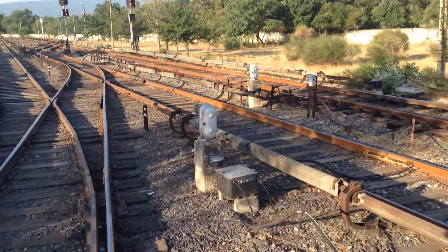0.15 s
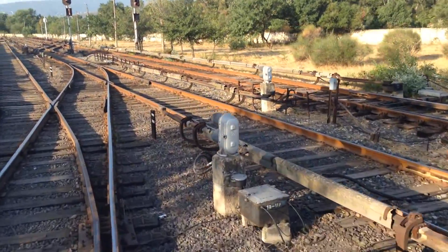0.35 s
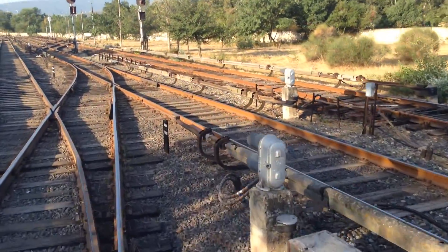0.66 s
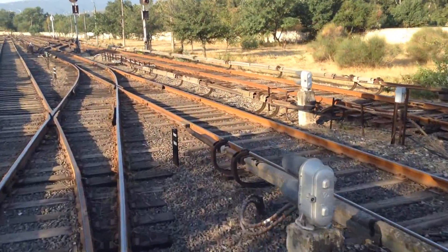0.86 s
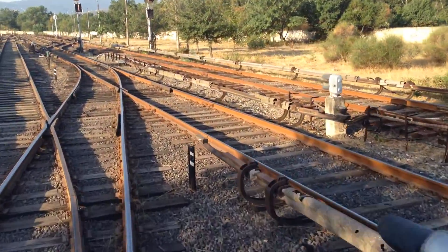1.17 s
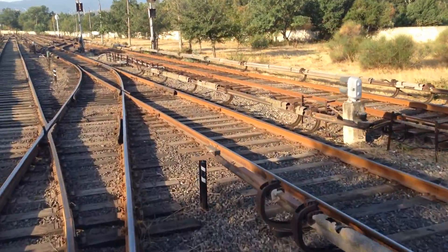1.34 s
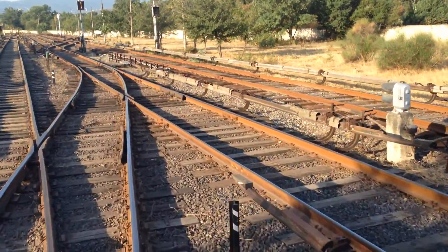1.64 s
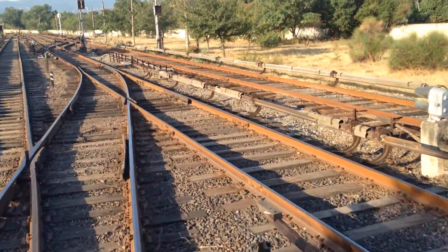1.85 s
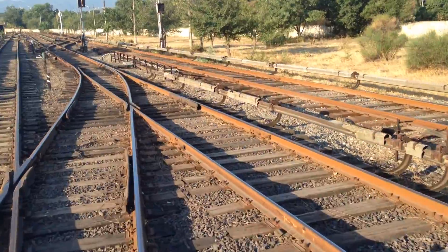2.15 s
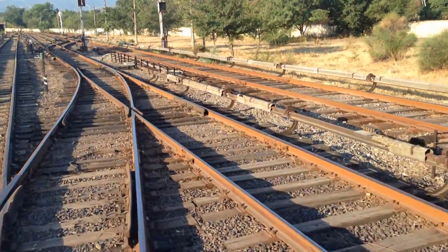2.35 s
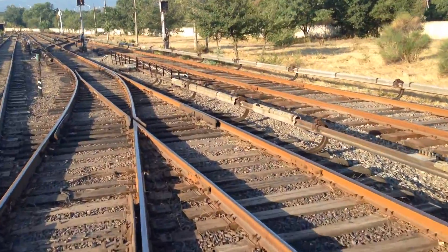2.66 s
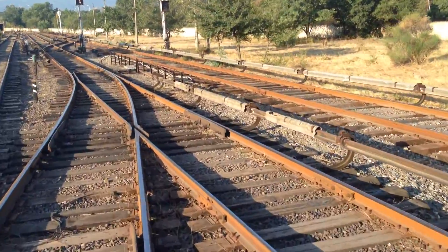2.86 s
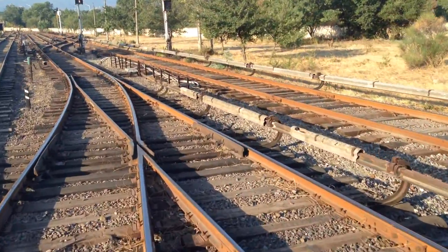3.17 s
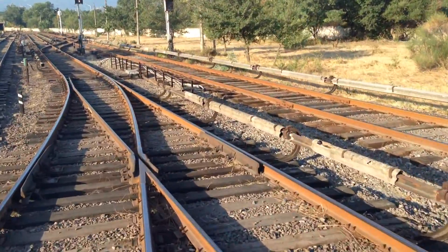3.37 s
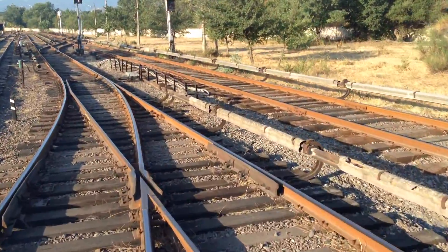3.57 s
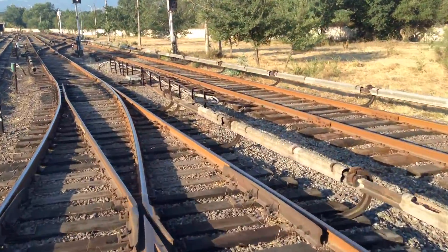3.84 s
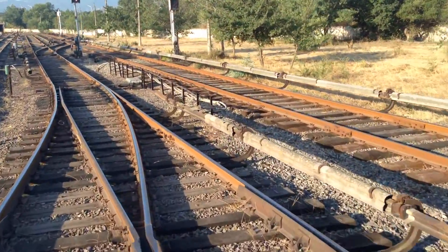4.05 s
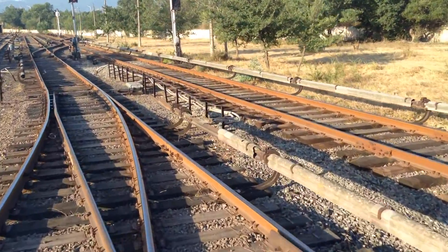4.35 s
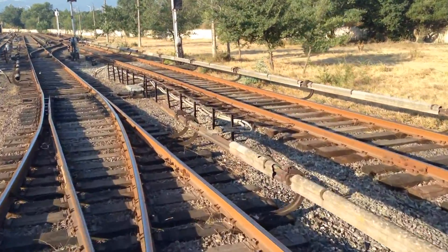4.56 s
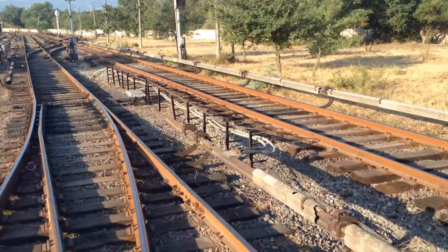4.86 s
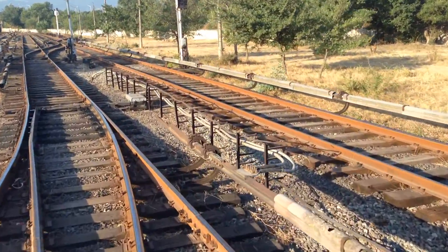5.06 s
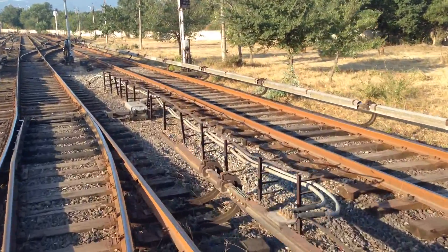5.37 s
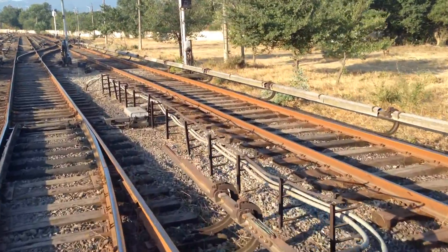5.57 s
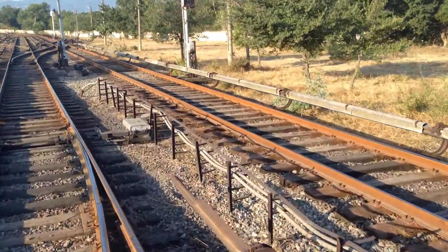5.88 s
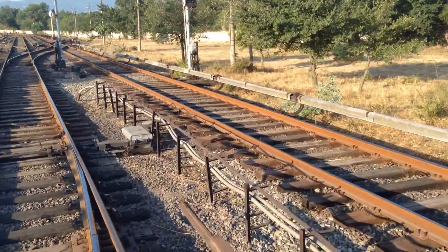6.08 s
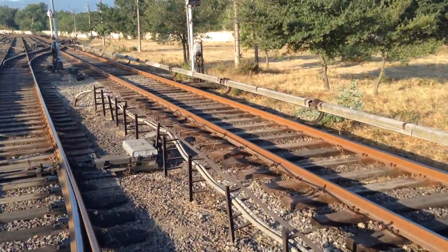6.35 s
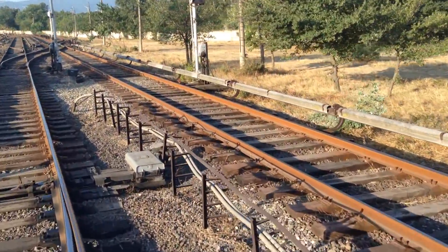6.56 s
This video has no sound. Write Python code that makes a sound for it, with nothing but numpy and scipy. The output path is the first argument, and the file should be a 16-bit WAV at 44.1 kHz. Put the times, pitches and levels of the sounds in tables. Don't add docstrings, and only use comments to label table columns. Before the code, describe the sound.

High, fluttering steel wheel squeal fades into rumbling and heavy clanking knocks over rail switches, finishing with pulsing low hoots from the wheels.

```python
import sys
import numpy as np
from scipy import signal
from scipy.fft import rfft, irfft, next_fast_len
from scipy.io import wavfile
from scipy.ndimage import uniform_filter1d, map_coordinates

SR = 44100
rng = np.random.default_rng(int(sys.argv[2]) if len(sys.argv) > 2 else 0)


def ratio_of_db(decibels):
    return 10 ** (np.asarray(decibels, float) / 20)


def dump(signal):
    limited = np.clip(np.atleast_2d(signal).T, -1, 1)
    pcm = np.round(limited * 32767).astype(np.int16)
    wavfile.write(sys.argv[1], SR, pcm)


N = 296352


def unit(x):
    return x / np.sqrt(np.mean(x ** 2) + 1e-20)


def along(points, hz):
    f, v = np.transpose(points)
    return np.interp(np.log(hz + 1), np.log(f + 1), v)


def curves(rows):
    s, *cols = np.transpose(rows)
    return [np.interp(np.arange(N) / SR, s, c) for c in cols]


def wobble(rate):
    coarse = np.arange(0, N + 32, 32)
    knots = rng.standard_normal(int(N * rate / SR) + 4)
    return np.interp(np.arange(N), coarse, map_coordinates(knots, [coarse * rate / SR]))


def spells(rows):
    t = np.arange(0, N + 32, 32) / SR
    s, db, half = np.transpose(rows)[:, :, None]
    swells = ratio_of_db(db) * np.exp(-((t - s) / half) ** 2)
    return np.interp(np.arange(N) / SR, t, np.sum(swells, axis=0))


def filtered(x, response):
    m = next_fast_len(x.shape[-1] + 4096, True)
    return irfft(rfft(x, m) * response(np.fft.rfftfreq(m, 1 / SR)), m)[..., :x.shape[-1]]


def mode(hz, centre_hz, width_hz):
    return 1j * hz * width_hz / (centre_hz ** 2 - hz ** 2 + 1j * hz * width_hz)


def rush(response, patchy_db):
    z = signal.stft(rng.standard_normal(N + 512), nperseg=512)[2]
    field = uniform_filter1d(rng.standard_normal(z.shape), 5, 0)
    field = uniform_filter1d(field, 10, 1)
    noise = signal.istft(z * ratio_of_db(patchy_db * unit(field)), nperseg=512)[1][:N]
    return unit(filtered(noise, response))


def phase(hz):
    return 2 * np.pi * np.cumsum(hz + np.zeros(N)) / SR


# t/s, mode f/Hz, level/dB, half length/s
RING_UPS = [(0.056, 2531, 6, 0.13), (2.83, 2531, 6, 0.11), (3.64, 2531, 14, 0.1), (3.37, 2531, 4, 0.14),
            (1.75, 4940, -4, 0.3), (2.83, 4940, 3, .1), (1.04, 2531, 2, 0.091), (3.71, 4940, 5.5, 0.16),
            (3.7, 6217, 4, 0.13), (6.21, 3710, 4.5, 0.14), (6.11, 4940, 8, 0.072), (6.47, 4940, 8, 0.19)]


def ring_up(hz):
    return 1 + spells([(s, db - 200 * (abs(at / hz - 1) > .1), half) for s, at, db, half in RING_UPS])


# f/Hz, level/dB per Hz
RUMBLE = [(12, -55), (20, -24), (38, -13), (70, 6), (86, 8), (108, -28), (130, -3.5), (170, -10),
          (290, -120)]
# f/Hz, level/dB per Hz
BODY = [(59, -9.5), (100, -1.5), (277, 1), (471, -6.5), (570, -8), (661, -12), (970, -17.5), (1180, -13),
        (1440, -16), (1630, -25), (2490, -17.5), (2930, -52), (3400, -31), (4420, -23), (7480, -120)]
# f/Hz, level/dB per Hz
HISS = [(1500, -120), (3000, -6.5), (5000, 2), (8000, 3), (10500, 0.5), (13000, -4), (15300, -6),
        (17000, -18)]
# f/Hz, level/dB per Hz
RAILS = [(1500, -120), (2600, 3.5), (3600, -8.5), (4300, -2), (5200, 2), (6500, 5), (8000, -6),
         (10000, -7.5), (13000, -22), (17000, -17)]
# f/Hz, width/Hz, level/dB
WHEEL_MODES = [(1172, 150, 2.5), (2528, 73, 4), (3168, 94, -4), (3700, 92, 2.5), (4940, 110, 2),
               (6200, 55, 1), (6520, 150, 0.5), (7640, 140, -4), (8720, 110, -9.5), (9600, 85, -18)]
# t/s, level/dB
GRIND = [(0, -49), (.2, -56), (.45, -53.5), (1.66, -58), (2.1, -62.5), (2.35, -61), (4.45, -68), (5, -68.5),
         (6.05, -64.5), (6.72, -65.5)]
# t/s, rumble level/dB, rail body level/dB, half length/s
LURCHES = [(0, -59, -43.5, 0.25), (0.416, -42.5, -38, 0.096), (0.843, -48, -35, 0.093),
           (1.004, -39.5, -51, 0.11), (1.297, -29, -38.5, 0.045), (1.44, -40, -42, 0.14),
           (1.863, -54, -45, 0.45), (2.137, -37, -51, 0.04), (2.53, -42.5, -51.5, 0.13),
           (2.832, -54, -38, 0.065), (3.04, -42.5, -45, 0.31), (3.486, -50, -50.5, 0.58),
           (3.677, -42, -60, 0.064), (4.166, -42, -48, 0.19), (4.483, -34, -76, 0.057),
           (4.69, -47, -45, 0.13), (5.044, -47, -60, 0.13), (5.587, -43, -48, 0.74),
           (6.066, -39, -42.5, 0.054), (6.28, -48, -45, 0.1), (6.537, -34.5, -41, 0.09),
           (6.72, -64, -36, 0.08)]
# t/s, level/dB, half length/s
SCRAPES = [
    (6.6, -61, 0.028),
]


def rolling():
    grind_db, = curves(GRIND)
    even_db = -44 + .5 * np.arange(N) / SR
    shake = ratio_of_db(-49.5) + spells([(s, db, half) for s, db, _, half in LURCHES])
    load = ratio_of_db(even_db) + spells([(s, db, half) for s, _, db, half in LURCHES])
    rumble = shake * rush(lambda f: ratio_of_db(along(RUMBLE, f)), patchy_db=0.5)
    body = load * ratio_of_db(0.34 * wobble(9.4)) * rush(lambda f: ratio_of_db(along(BODY, f)), patchy_db=2.5)
    flange = (ratio_of_db(grind_db) + spells(SCRAPES)) * ratio_of_db(9.0)
    hiss = flange * rush(lambda f: ratio_of_db(along(HISS, f)), patchy_db=2.0)
    rail_gain = ratio_of_db(-53.5 + 0.59 * wobble(4.16) + 0.63 * wobble(36))
    rails = rail_gain * rush(lambda f: ratio_of_db(along(RAILS, f)), patchy_db=3.0)

    modes = filtered(rng.standard_normal(N),
                     lambda f: np.array([mode(f, hz, width) ** 2 for hz, width, _ in WHEEL_MODES]))
    rings = sum(ratio_of_db(db + 1.3 * wobble(4.95)) * ring_up(hz) * ring
                for ring, (hz, _, db) in zip(modes, WHEEL_MODES))
    kicks = spells([(s, db + clank_db - 39, 0.013) for s, db, _, clank_db, _ in blows()])
    ring_gain = ratio_of_db(-56 + 0.56 * (grind_db - grind_db.mean())) + kicks
    return rumble + body + hiss + rails + ring_gain * ratio_of_db(6) * unit(rings)


# t/s, f/Hz
SQUEAL_PITCH = [(0, 3715), (1.3, 3712), (1.8, 3717), (3.8, 3714), (4.1, 3710), (5.2, 3700)]
# f/Hz, width/Hz, level/dB
NEIGHBOURS = [
    (3727, 42, -1),
    (3675, 58, -5),
    (7402, 163, -12.5),
]
# t/s, level/dB
SLIP = [(0, -28), (.09, -38), (.14, -32), (.55, -37.5), (.61, -32), (.65, -31), (.7, -32.5), (1.05, -32),
        (1.17, -31), (2.2, -33), (2.55, -40), (2.75, -37), (3.46, -35.5), (3.68, -39.5), (4.02, -43.5),
        (4.5, -41), (4.8, -55.5), (5.2, -43)]
# t/s, level/dB, half length/s
LOCKS = [(0.014, -24.5, 0.018), (0.072, -20, 0.034), (0.183, -39, 0.14), (0.223, -27, 0.0088),
         (0.326, -31, 0.017), (0.468, -33, 0.0081), (0.477, -24, 0.064), (0.604, -24.5, 0.021),
         (0.695, -23.5, 0.0087), (0.734, -25.5, 0.059), (0.837, -22, 0.012), (0.889, -28.5, 0.02),
         (0.944, -29, 0.018), (1.014, -28.5, 0.043), (1.015, -35, 0.029), (1.123, -20.5, 0.024),
         (1.173, -19, 0.022), (1.217, -27, 0.0062), (1.292, -22.5, 0.043), (1.363, -26, 0.015),
         (1.402, -29.0, 0.016), (1.447, -27.5, 0.016), (1.504, -24, 0.014), (1.576, -31.5, 0.061),
         (1.721, -30, 0.06), (1.806, -30, 0.019), (1.923, -26.0, 0.073), (2.129, -42.5, 0.36),
         (2.186, -27, 0.0051), (2.204, -31, .008), (2.228, -32, .008), (2.409, -30, 0.02),
         (2.451, -32.5, 0.074), (2.609, -29, 0.016), (2.73, -26, 0.012), (2.732, -40, 0.058),
         (2.817, -29.5, 0.0083), (2.884, -33.5, 0.012), (2.989, -27.0, 0.055), (3.06, -28, 0.025),
         (3.165, -26, 0.046), (3.284, -31, 0.014), (3.441, -36, 0.0071), (3.469, -34, 0.1),
         (3.686, -30.5, 0.056), (3.733, -35.5, 0.02), (3.801, -33, 0.019), (4.02, -42, 0.1),
         (4.254, -41.5, 0.057), (4.369, -37, 0.025), (4.495, -34.5, 0.1), (4.62, -47, 0.01),
         (4.851, -56, 0.29)]
# t/s, level/dB, half length/s
JUMPS = [(0.027, -45, 0.035), (0.083, -33.5, 0.034), (0.18, -50, 0.01), (0.209, -50, 0.084),
         (0.401, -44, 0.019), (0.498, -37.5, 0.035), (0.593, -46, 0.14), (0.686, -38, 0.038),
         (0.818, -42, 0.028), (0.913, -37, 0.024), (0.964, -35.5, 0.015), (1.091, -40.0, 0.06),
         (1.228, -38.5, 0.038), (1.289, -35.5, 0.023), (1.351, -32.5, 0.014), (1.389, -43.5, 0.099),
         (1.474, -44.5, 0.0083), (1.516, -43, 0.17), (1.538, -43, 0.0084), (1.776, -33.5, 0.064),
         (1.844, -35.5, 0.018), (1.929, -40, 0.036), (2.02, -41.5, 0.02), (2.056, -40, 0.011),
         (2.134, -41.5, 0.058), (2.273, -38.5, 0.047), (2.366, -38, 0.055), (2.492, -33.0, 0.04),
         (2.552, -33, 0.066), (2.702, -38, 0.055), (2.848, -41.5, 0.066), (2.98, -43, 0.038),
         (3.089, -46.5, 0.038), (3.294, -48, 0.19), (3.435, -44, 0.019), (3.575, -40.5, 0.062),
         (3.745, -45.5, 0.06)]


def squeal():
    (others_db,), (grind_db,) = curves(SLIP), curves(GRIND)
    lock = spells(LOCKS) + ratio_of_db(others_db - 25)
    jump = spells(JUMPS) + ratio_of_db(others_db - 36)
    third = ratio_of_db(1.8 * (grind_db - GRIND[2][1]) + 2.3 * wobble(7.2))
    third = third * (ratio_of_db(-48) + ratio_of_db(-28) * jump)
    hz, = curves(SQUEAL_PITCH)
    fade = np.clip((SLIP[-1][0] - np.arange(N) / SR) / 0.19, 0, 1)
    turn = phase(hz + 1.49 * wobble(29.99))
    tone = lock * ratio_of_db(1.4 * wobble(45)) * np.sin(turn + 0.12 * wobble(60))
    tone += jump * ratio_of_db(3.5 + 1.53 * wobble(50)) * np.sin(2 * turn + 0.28 * wobble(60))
    tone += third * ratio_of_db(-3 + 4.5 * wobble(75)) * np.sin(3 * turn - phase(36) + 1.3 * wobble(140))
    tone += third * ratio_of_db(-9.5 + 2.5 * wobble(60)) * np.sin(4 * turn - phase(50) + 2.8 * wobble(200))

    def band(f):
        return sum(ratio_of_db(db) * mode(f, hz, width) ** 2 for hz, width, db in NEIGHBOURS)

    others = ratio_of_db(others_db - 4.5 + 0.88 * wobble(29.77)) * rush(band, patchy_db=0.0)
    return fade * (tone + others)


# t/s, level/dB, half length/s
CATCHES = [(0.006, -37, 0.0099), (0.062, -46.0, 0.015), (0.19, -35, 0.16), (0.329, -40.5, 0.0094),
           (0.445, -37, 0.087), (0.456, -39, 0.016), (0.623, -39, 0.105), (0.838, -31, 0.069),
           (0.983, -37, 0.02), (1.052, -28, 0.017), (1.118, -44, 0.07), (1.203, -26, 0.012),
           (1.308, -24.5, 0.018), (1.342, -35, 0.13), (1.52, -35, 0.078), (1.677, -31, 0.044),
           (1.815, -28.5, 0.086), (1.999, -30, 0.039), (2.162, -33.5, 0.2), (2.335, -25.5, 0.0096),
           (2.433, -47, 0.048), (2.598, -36, 0.17), (2.774, -37, 0.016), (2.826, -49, 0.021),
           (2.989, -38.5, 0.12), (3.086, -32, 0.011), (3.157, -39.5, 0.035), (3.312, -34.5, 0.09),
           (3.545, -40.5, 0.15), (3.552, -45, 0.011), (3.867, -43.5, 0.17), (4.202, -38.5, 0.086),
           (4.513, -41, 0.17), (4.522, -38, 0.015)]


def partner():
    turn = phase(3675 + 6 * wobble(7.6))
    return spells(CATCHES) * ratio_of_db(-1.5 + 2.9 * wobble(40)) * np.sin(turn + 0.5 * wobble(60))


# t/s, f/Hz
HOWL_PITCH = [(0, 578), (6.3, 570.8), (6.5, 581), (6.62, 574.5), (6.72, 589)]
# multiple, level/dB
HOWL_PARTIALS = [(2, -32), (3, -30), (4, -29)]
# t/s, level/dB, half length/s
HOWLS = [(0, -44, 0.13), (.42, -48.5, 0.31), (.8, -53, 0.033), (1.0, -49, 0.031), (1.24, -29, 0.0075),
         (1.42, -48, 0.063), (1.66, -44.5, 0.044), (1.94, -44, 0.034), (2.12, -40, 0.033),
         (2.3, -46.5, 0.086), (2.55, -38, 0.086), (2.68, -43, 0.099), (2.81, -41.5, 0.068),
         (3.12, -49.5, 0.33), (3.92, -44.5, 0.06), (4.33, -47, 0.031), (4.5, -36, 0.033), (4.78, -44, 0.6),
         (5.18, -50, 0.12), (5.57, -45, 0.055), (5.77, -42, 0.053), (6.18, -42, 0.16)]
# t/s, level/dB, half length/s
SURGES = [
    (6.348, -18.5, 0.022),
    (6.447, -12.5, 0.029),
    (6.548, -14, 0.04),
    (6.655, -18.5, 0.04),
    (6.7, -17.5, 0.023),
]
# t/s, level/dB, half length/s
SNAPS_2 = [(6.38, -44, 0.015), (6.437, -44.0, 0.033), (6.56, -42.5, 0.05), (6.565, -42, 0.011),
           (6.667, -48.5, 0.016), (6.706, -38, 0.0082)]
# t/s, level/dB, half length/s
SNAPS_3 = [(6.444, -51, 0.015), (6.499, -53.5, 0.0062), (6.575, -42, 0.008), (6.598, -46, 0.01),
           (6.69, -41, 0.012)]
# t/s, level/dB, half length/s
WHISTLES = [
    (.074, -45.5, 0.039),
    (.18, -45, 0.014),
    (.33, -56, 0.065),
            (2.753, -46, 0.019), (2.81, -49, 0.11), (2.853, -39, 0.022), (3.058, -42, 0.013),
         (2.944, -33, 0.006), (2.961, -31.5, 0.076), (3.111, -32.5, 0.029), (3.162, -37.5, 0.017),
         (3.236, -37.5, 0.045), (3.343, -46.0, 0.034), (3.47, -52, 0.033), (3.585, -47, 0.013),
         (3.63, -48, 0.013), (3.88, -47.5, 0.026), (3.988, -47, 0.011), (4.05, -47, 0.019),
         (4.15, -41.5, 0.021), (4.261, -50, 0.009)]


def low_modes():
    howl = spells(HOWLS) + spells(SURGES)
    turn = phase(curves(HOWL_PITCH)[0] + 1.1 * wobble(22))
    loose = np.clip(1 - howl / ratio_of_db(-33.0), 0, 1)
    tone = howl * ratio_of_db(1.5 + 4.9 * loose * wobble(30)) * np.sin(turn + 1.34 * loose * wobble(35))
    drive = uniform_filter1d(howl, size=7000, origin=700) ** 2 / ratio_of_db(-13.5)
    snaps = {2: SNAPS_2, 3: SNAPS_3}
    for k, db in HOWL_PARTIALS:
        k = round(k)
        snap = ratio_of_db(2.5) * spells(snaps[k]) if k in snaps else 0
        gain = drive * ratio_of_db(db + 2.6 * wobble(70)) + snap
        tone += gain * np.sin(k * turn + 0.4 * k * wobble(90))
    whistle = np.sin(phase(1440 + 5 * wobble(25.1)))
    return tone + spells(WHISTLES) * ratio_of_db(1.9 + 1.2 * wobble(45)) * whistle


JOINT_S = 0.027
# t/s, peak level/dB, thud f/Hz, clank under the thud level/dB
JOINTS = [(.363, -28.5, 261, -26), (0.682, -33, 271, -9), (1.651, -31.5, 139, -5), (1.969, -30, 244, -3),
          (2.504, -28, 173, -45), (2.589, -27, 403, -10), (2.819, -25, 254, -17.5), (3.062, -31.5, 361, -2),
          (3.543, -28.5, 269, -8.5), (3.85, -29, 270, -8.5), (4.245, -26, 254.5, -8.5),
          (4.639, -23, 275, -11), (5.124, -29.5, 349, -5.5), (5.445, -28.5, 255, -8.5),
          (5.548, -24, 254.7, -16), (5.929, -30.5, 241, -13), (6.048, -25, 264, -17),
          (6.217, -23, 248, -15), (6.589, -31.5, 320, -7)]
# t/s, peak level/dB, thud f/Hz, clank under the thud level/dB, length/s
GAPS = [(.772, -16, 268, -4.5, 0.025), (1.235, -19, 140, -12, 0.025), (2.114, -21, 153, -12, 0.015),
        (2.336, -20, 265.3, -17, 0.051), (2.656, -22, 158.3, -40, 0.0079), (3.649, -20, 153.4, -26, 0.011),
        (4.084, -20, 197, -9, 0.015), (4.488, -8, 413, -10.5, 0.019), (4.544, -18, 378, -8.5, 0.013),
        (4.967, -16.5, 326, -9, 0.025), (5.199, -9, 245, -18, 0.022), (5.302, -20, 237.5, -11.5, 0.028),
        (5.683, -15.5, 260, -16, 0.036), (5.774, -23, 149, -10.5, 0.041), (6.143, -21.5, 164, -22, 0.012)]


def blows():
    return sorted(GAPS + [row + (JOINT_S,) for row in JOINTS])


# f/Hz, level/dB
THUD = [(40, -23), (90, -29), (150, 0.5), (260, -2), (420, -2.5), (700, -16), (1200, -51), (2500, -120)]
# f/Hz, level/dB
CLANK = [(300, -17), (700, 14.5), (1400, 9), (2600, 1), (3000, -9.5), (4000, -10), (7000, -11.5),
         (11000, -43), (15000, -63)]


def joints():
    out, t = np.zeros(N + SR), np.arange(SR // 3) / SR
    shake = rng.standard_normal((len(blows()), 3, len(t)))
    rattles = filtered(shake[:, 0], lambda f: ratio_of_db(along(THUD, f)))
    rattles /= np.sqrt(np.abs(uniform_filter1d(rattles ** 2, size=500)) + 1e-9)
    clanks = unit(filtered(shake[:, 1], lambda f: ratio_of_db(along(CLANK, f))))
    edges = unit(filtered(shake[:, 2],
                          lambda f: mode(f, 2700, 4200) ** 2 * (1 - 0.39 * mode(f, 3080, 700))))
    for (s, db, hz, clank_db, length), rattle, clank, edge in zip(blows(), rattles, clanks, edges):
        u = t / np.clip(length, .004, .08)
        ring_on = 0.14 * (1 - np.exp(-u)) * ratio_of_db(-60 * t / 1.5) * (1 - t / t[-1])
        swell = u ** 0.33 * np.exp(0.22 * (1 - u * u)) + ring_on
        edge_db = -49.5 + (db + clank_db + 34) - db
        gap = length != JOINT_S
        late = np.clip(t - 0.01194, 0, None)
        strike = ratio_of_db(-5.5 - 10 * gap) * np.exp(-late / 0.0086) * np.sin(2 * np.pi * hz * late)
        note = np.clip(.28 - 0.018 * clank_db, 0, 1)
        thud = 0.48 * ratio_of_db(-2.5 * gap) * (1.2 - note) * rattle
        thud += 0.54 * ratio_of_db(-4 * gap) * note * np.sin(2 * np.pi * hz * t)
        hit = thud + ratio_of_db(clank_db - 8.5) * swell ** 0.19 * clank + ratio_of_db(edge_db - 6.5) * edge
        out[max(round((s - .009) * SR), 0):][:len(t)] += ratio_of_db(db) * (swell * hit + strike)
    return out[:N]


# t/s, level/dB, half length/s
SCUFFS = [
    (.55, -50, 0.18),
    (1.07, -45, 0.12),
    (4.655, -50, 0.016),
    (5.318, -47, 0.016),
]
# t/s, level/dB, half length/s
CRACKS = [
    (.787, -41.5, 0.038),
    (4.508, -52, .02),
]


def scuffs():
    drag = spells(SCUFFS) * rush(lambda f: mode(f, 1900, 1700) ** 2, patchy_db=1.5)
    return drag + spells(CRACKS) * rush(lambda f: mode(f, 4900, 2700) ** 2, patchy_db=-1.0)


# t/s, f/Hz, level/dB, length/s
CHIRPS = [(.5, 11110, -52, .05), (.51, 810, -44, .03), (1.07, 1740, -52, .06), (1.07, 2780, -50, .02),
          (5.14, 1200, -45, .012), (4.8, 3300, -61, .03), (4.93, 6200, -51, .06), (5.63, 9650, -56, .012),
          (5.98, 9650, -57, .012)]


def chirps():
    t, flutter_db = np.arange(N) / SR, 5 * wobble(60)
    waver = phase(18 * wobble(55))
    return sum(ratio_of_db(db + flutter_db) * np.exp(-((t - s) / length) ** 2)
               * np.sin(2 * np.pi * hz * t + waver)
               for s, hz, db, length in CHIRPS)


# t/s, peak level/dB, f/Hz
KNOCKS = [(0.764, -16.5, 230), (0.7737, -16, 250), (.7787, -15, 290), (0.785, -12.5, 319), (.791, -16, 413),
          (0.808, -13, 270), (0.825, -22, 330), (1.238, -26, 356), (1.247, -21, 360), (1.254, -20, 273),
          (1.266, -15, 406), (1.274, -22, 278), (1.281, -20, 115), (1.294, -25, 110), (2.1175, -18, 135),
          (2.123, -22, 159), (2.129, -27, 170), (2.345, -29, 268), (2.358, -16.5, 275), (2.379, -19, 328),
          (2.664, -22, 196), (2.833, -22, 236), (4.082, -17.5, 296), (4.493, -9.5, 382), (4.502, -14, 296),
          (4.516, -10, 345), (4.524, -10.5, 245), (4.53, -16, 248), (4.549, -16, 407), (4.564, -25, 351),
          (4.66, -28, 290), (4.967, -27, 237), (4.974, -16, 346), (4.991, -16, 326), (5.189, -19, 358),
          (5.201, -4.5, 245), (5.221, -5.5, 258), (5.244, -26, 293), (5.251, -22, 250), (5.301, -28, 317),
          (5.308, -26, 248), (5.32, -21, 215), (5.329, -18.5, 303), (5.351, -20, 260), (5.568, -25, 228),
          (5.676, -16.5, 377), (5.689, -11, 307), (5.703, -29, 280), (5.72, -24, 270), (5.759, -20, 326),
          (5.804, -24, 225), (6.152, -21, 196), (6.221, -19, 316), (6.236, -23, 293)]


def knocks():
    out, t = np.zeros(N + SR), np.arange(SR // 20) / SR
    for s, db, hz in KNOCKS:
        rise = 0.95 / hz
        push = (t / rise * np.exp(1 - t / rise)) ** 2
        knock = push * np.cos(2 * np.pi * hz * (t - rise))
        out[round((s - rise) * SR):][:len(t)] -= ratio_of_db(db - 3) * knock
    return out[:N]


def scene():
    wheels = rolling() + squeal() + partner() + low_modes()
    return (wheels + joints() + scuffs() + chirps() + knocks())[None]


def masked(x, under_db, slope_db, tilt_db, chance_db):
    hz, _, z = signal.stft(x, SR, nperseg=2048)
    power = uniform_filter1d(np.abs(z) ** 2, size=2, axis=2)
    hz_column = hz[:, None]
    octave = np.log2(hz_column / 4000 + 0.006)
    masker = 10 * np.log10(np.abs(power) + 1e-14) + tilt_db * octave - 200 * (hz_column < 1300)
    shadow = np.maximum.accumulate(masker + slope_db * octave, axis=1) - slope_db * octave
    shadow = shadow - under_db - 4 * np.clip(hz_column / 1000 - 11, 0, 9)
    band = 10 * np.log10(np.abs(uniform_filter1d(power, size=11, axis=1)) + 1e-14)
    luck = rng.standard_normal((len(hz) // 8 + 1, z.shape[2] // 2 + 1))
    luck = np.repeat(np.repeat(luck, 8, 0), 2, 1)[:len(hz), :z.shape[2]]
    band = band + chance_db * np.where(hz < 4650, 1, .3)[:, None] * luck
    kept = z / (1 + ratio_of_db(np.clip(8 * (shadow - band), -99, 60)))
    return signal.istft(kept, SR, nperseg=2048)[1][:, :N]


def band_limit(x):
    return signal.sosfilt(signal.butter(12, 15810, fs=SR, output="sos"), x)


def record(dry):
    heard = filtered(dry[0], lambda hz: np.clip((15430 - hz) / 100, 0, 1))[None]
    mix = masked(heard, under_db=31, slope_db=19, tilt_db=4.6, chance_db=3.5)
    return band_limit(mix)


dry = scene()
out = record(dry)
dump(out)
```